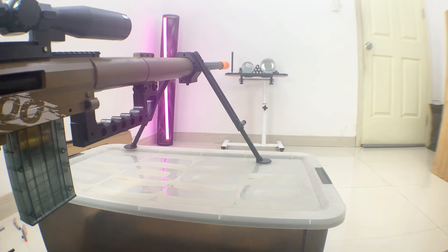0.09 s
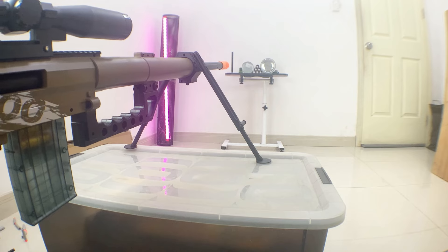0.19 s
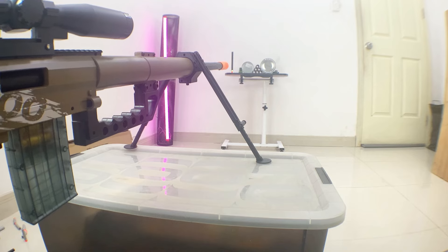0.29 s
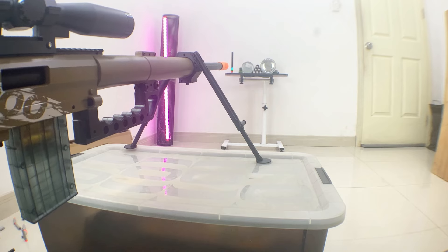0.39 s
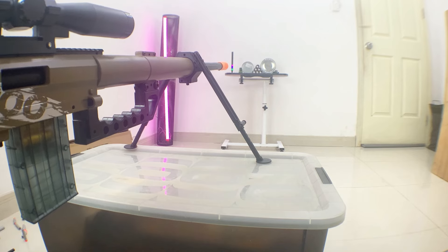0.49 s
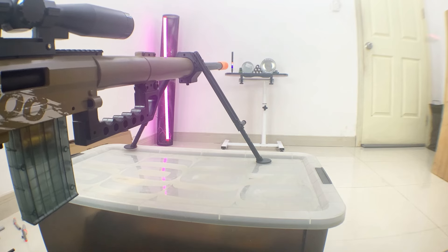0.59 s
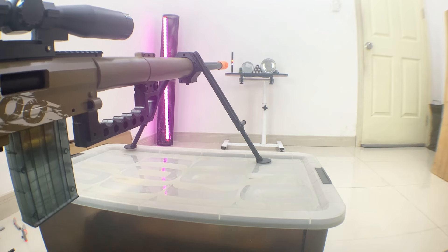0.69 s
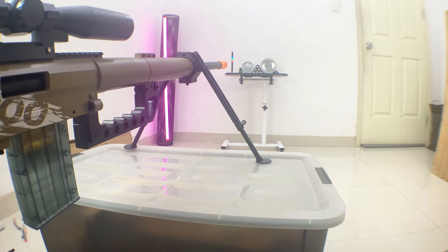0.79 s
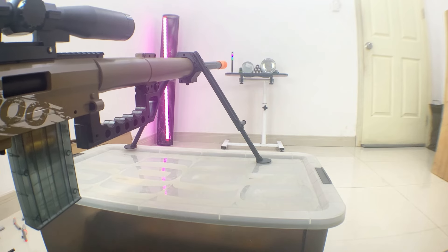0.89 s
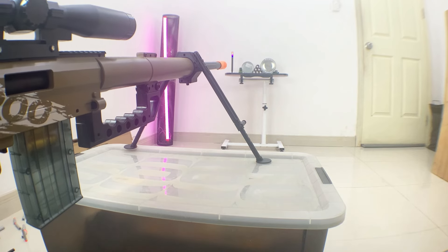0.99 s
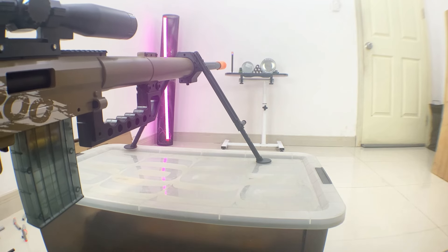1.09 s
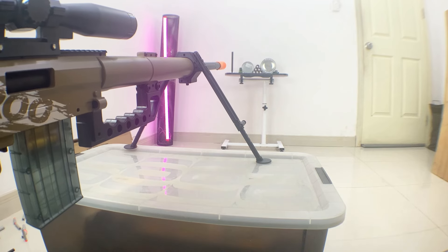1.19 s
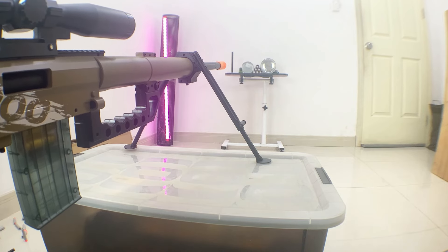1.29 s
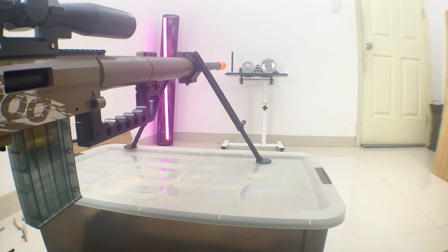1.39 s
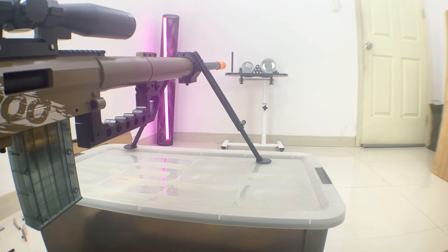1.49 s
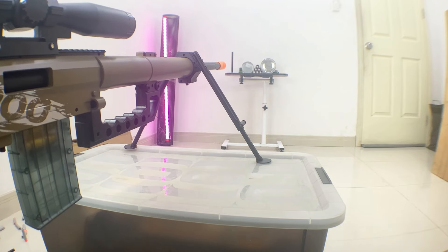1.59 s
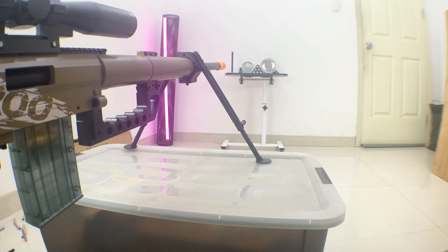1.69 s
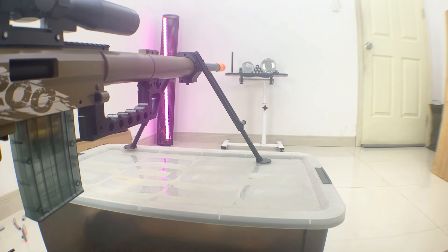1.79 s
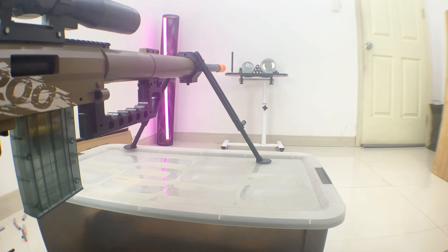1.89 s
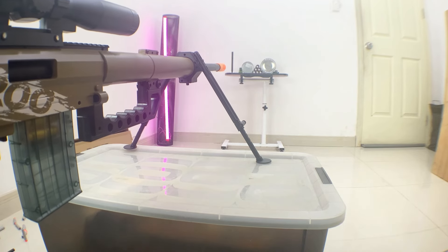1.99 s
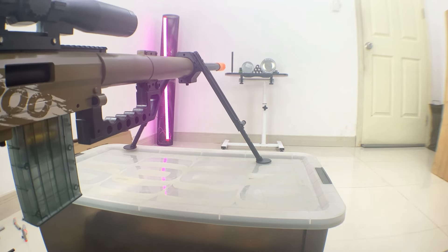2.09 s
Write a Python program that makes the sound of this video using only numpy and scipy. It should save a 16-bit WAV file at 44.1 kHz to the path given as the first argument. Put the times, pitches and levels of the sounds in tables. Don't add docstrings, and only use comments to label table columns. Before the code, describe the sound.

A toy dart rifle fires at 0.2 seconds with a tiny tick and hard plunger slam. At 0.31 the dart smacks a tin target, very loud and slightly squashed, rattling until 0.5 and ringing with wavering tones. At 0.93 the dart knocks sharply on the floor and bounces. From 1.2 to 2.1 faint plastic creaks, then a short double squeak near 2.0, over quiet room hum and tiled echo.

```python
import sys
import numpy as np
from scipy import signal
from scipy.fft import rfft, irfft, next_fast_len
from scipy.io import wavfile
from scipy.ndimage import uniform_filter1d, minimum_filter1d, map_coordinates

SR = 44100
rng = np.random.default_rng(int(sys.argv[2]) if len(sys.argv) > 2 else 0)


def boost(x):
    u = np.asarray(x, float) / 20
    return 10 ** u


def transcribe(u):
    v = np.clip(np.atleast_2d(u).T, -1, 1)
    q = np.round(v * 32767).astype(np.int16)
    wavfile.write(sys.argv[1], SR, q)


N = 94815
STRIKE_S = 0.3122


def unit(x):
    return x / np.sqrt(np.mean(x ** 2) + 1e-20)


def along(points, hz):
    f, v = np.transpose(points)
    return np.interp(np.log(hz + 1), np.log(f + 1), v)


def wobble(rate):
    knots = rng.standard_normal(int(N * rate / SR) + 4)
    return map_coordinates(knots, [np.arange(N) * rate / SR])


def filtered(x, response):
    m = next_fast_len(len(x) + 8192)
    h = response(np.fft.rfftfreq(m, 1 / SR))
    h = h / np.sqrt(np.mean(np.abs(h) ** 2))
    return irfft(rfft(x, m) * h, m)[:len(x)]


def resonance(f, centre, width, db):
    return boost(db) * 1j * f * width / (centre * centre - f * f + 1j * f * width)


def resonances(peaks):
    return lambda f: sum((-1) ** k * resonance(f, *peak) for k, peak in enumerate(peaks))


def causal(colour):
    def response(f):
        c = irfft(np.log(np.maximum(boost(along(colour, f)), 1e-5)))
        c[1:len(c) // 2] *= 2
        c[len(c) // 2 + 1:] = 0
        return np.exp(rfft(c))
    return response


def bursts(rows):
    t = np.arange(N) / SR
    x = np.zeros(N)
    for start, db, t60 in rows:
        fade = boost(db - 60 * np.abs(t - start) / t60)
        x += fade * (t >= start) * rng.standard_normal(N)
    return x


def clicks(rows):
    x = np.zeros(N)
    for start, db, t60 in rows:
        x[round(start * SR)] = boost(db) * np.sqrt(SR * t60 / np.log(1000) / 2)
    return x


def room(x, wet_db, feed=None):
    # frequency in Hz, time to fall by 60 dB in seconds.
    fading = [(100, 0.51), (350, 0.57), (1500, 0.64), (4000, 0.7), (8000, 0.57), (11500, 0.4),
              (13500, 0.24), (16000, 0.098)]
    hz, t, z = signal.stft(rng.standard_normal(SR), SR, nperseg=256)
    fade = boost(-60 * t / along(fading, hz)[:, None])
    tail = signal.istft(z / np.abs(z) * fade, SR, nperseg=256)[1]
    tail = np.pad(tail / np.linalg.norm(tail), (round(0.004 * SR), 0))
    source = x if feed is None else feed
    return x + boost(wet_db) * signal.fftconvolve(source, tail)[:N]


def knock(rows, colour, body, ring_db, wet_db):
    def response(f):
        lift = 1 + boost(ring_db) * sum(resonance(f, *peak) for peak in body)
        return causal(colour)(f) * lift
    return room(filtered(bursts(rows), response), wet_db, filtered(clicks(rows), response))


def room_air_and_hum():
    # frequency in Hz, level in dB per Hz.
    air_colour = [(12, -30), (20, -1), (100, -7.5), (226, -22), (365, -21), (1870, -33.5), (3380, -30.5),
                  (15000, -48), (16800, -65)]
    # frequency in Hz, width in Hz, level in dB.
    machine = [(320, 37, 2), (653, 27, 1.5), (1660, 250, -7.5), (2180, 130, -16), (3270, 110, -1.5),
               (4140, 200, -11.5), (6820, 48, -12.5), (9700, 94, -18), (10650, 140, -14.5)]
    air = unit(filtered(rng.standard_normal(N), lambda f: boost(along(air_colour, f))))
    hum = unit(filtered(rng.standard_normal(N), resonances(machine)))
    patchy_db = -3.5
    return boost(-51 + patchy_db * wobble(1.5)) * air + boost(-61.5 + patchy_db * wobble(10.0)) * hum


def creaks():
    # start in seconds, level in dB, centre in Hz, time to fall by 60 dB in seconds,
    # width as a share of the centre.
    joints = [(1.19, -47, 403, .05, .8), (1.2087, -44.5, 1810, 0.022, 2), (1.3355, -46, 1773, 0.017, 1.5),
              (1.4415, -55.5, 7000, 0.02, 1.8), (1.5174, -42, 2900, 0.013, 1.2),
              (1.5663, -56.5, 3310, 0.0062, 1.1), (1.596, -53, 4500, 0.011, 1.5),
              (1.649, -51.5, 1497, 0.029, 0.25), (1.7412, -50, 1960, 0.016, 1.8),
              (1.778, -52.5, 1200, 0.039, 1.5), (1.789, -53, 398.6, 0.061, 0.96),
              (1.849, -48, 1373, 0.032, 0.68), (1.8629, -48, 5020, 0.013, 0.81),
              (2.0677, -56, 4540, 0.0082, 2), (2.069, -47.5, 4650, .04, .4), (2.091, -49.5, 800, 0.049, .7),
              (2.105, -48.5, 684, 0.053, .7), (2.116, -41, 1110, 0.029, 1.6),
              (2.13, -50.5, 910, 0.045, 1.3), (2.139, -54, 890, 0.05, 0.89)]
    x = np.zeros(N)
    for start, db, hz, t60, width in joints:
        joint = resonances([(hz, width * hz, 0)])
        x += filtered(bursts([(start, db, t60)]), lambda f: joint(f) ** 3)
    return room(x, -11.5)


def stick_slip(rows, overtones):
    # frequency in Hz, level in dB per Hz.
    haze_colour = [(2000, -19.5), (2900, -10.5), (3700, -2.5), (4200, -18), (6000, -13), (7500, -23.5),
                   (12000, -38), (16000, -50.5)]
    t = np.arange(N) / SR
    start, hz, db = np.transpose(rows)
    level_db = np.interp(t, start, db, -120, -120)
    pitch = np.interp(t, start, hz) * (1 + 0.012 * wobble(400))
    turn = 2 * np.pi * np.cumsum(pitch) / SR
    sharp = boost(0.7 * (level_db + 36))
    tone = np.sin(turn) + sharp * sum(boost(g) * np.sin(k * turn) for k, g in overtones)
    rough_level = boost(level_db + 3 * wobble(420))
    haze = boost(-12) * filtered(rng.standard_normal(N), lambda f: boost(along(haze_colour, f)))
    haze_level = uniform_filter1d(boost(level_db), size=round(0.011 * SR))
    return tone * rough_level + haze * haze_level


def squeak():
    # time in seconds, pitch in Hz, level in dB.
    lower = [
        (1.945, 3100, -59),
        (1.962, 3115, -44.5),
        (1.97, 2980, -43.5),
        (1.979, 3014, -33.5),
        (1.984, 3233, -40.5),
        (1.991, 3105, -69.5),
        (2.003, 3057, -44.5),
        (2.022, 3100, -45.5),
        (2.053, 2863, -46),
        (2.061, 2930, -63.5),
    ]
    higher = [
        (1.979, 3600, -71),
        (1.986, 3650, -43),
        (2.002, 3600, -50),
        (2.019, 3550, -45),
        (2.028, 3450, -36.5),
        (2.046, 3490, -44.5),
        (2.061, 3480, -47),
        (2.071, 3480, -80.5),
    ]
    # multiple of the pitch, level in dB at full force.
    overtones = [
        [(2, -18), (3, -18), (4, -30)],
        [(2, -12), (3, -25), (4, -40)],
    ]
    return room(stick_slip(lower, overtones[0]) + stick_slip(higher, overtones[1]), -10)


def dart_landing():
    # start in seconds, level in dB, time to fall by 60 dB in seconds.
    hits = [
        (.9256, -15.5, 0.0057),
        (.927, -32, 0.015),
        (.932, -35, 0.0079),
        (.945, -29.5, 0.0092),
        (.955, -33.5, 0.024),
    ]
    # frequency in Hz, level in dB per Hz.
    colour = [(400, -24), (1200, -13.5), (1700, -7), (3100, -3.5), (3600, -16.5), (6800, -22),
              (9800, -19.5), (14000, -35)]
    # frequency in Hz, width in Hz, level in dB.
    body = [(1700, 100, 10.5), (2800, 900, -3), (4290, 250, 3), (4690, 264, 12)]
    return knock(hits, colour, body, ring_db=1.5, wet_db=-1)


def tin_blows():
    # start in seconds, level in dB, time to fall by 60 dB in seconds.
    strike = [
        (.3122, 6.5, 0.027),
        (.316, -1.5, .06),
    ]
    rattles = [
        (.36, -5, 0.02),
        (.385, 4.5, 0.022),
        (.409, -2.5, 0.018),
        (.428, -19, 0.0097),
        (.457, -1, 0.01),
        (.505, -11, 0.011),
    ]
    # frequency in Hz, level in dB per Hz.
    strike_colour = [(60, -58.5), (240, -31), (330, -15.5), (800, -12.5), (2500, -12.5), (4500, -12),
                     (9000, -14.5), (16000, -24)]
    rattle_colour = [(200, -46), (400, -10), (1700, -7), (2400, -5.5), (4500, -7.5), (7000, -28),
                     (16000, -60.5)]
    # frequency in Hz, width in Hz, level in dB.
    body = [(330, 73, 21.5), (420, 10, 7), (590, 35, 9), (770, 96, 4.5), (1344, 120, 5.5), (1690, 50, 9),
            (4070, 410, 1.5), (4505, 180, 1.5)]
    blow = knock(strike, strike_colour, body, ring_db=-1, wet_db=3.5)
    return blow + knock(rattles, rattle_colour, body, ring_db=-1, wet_db=-3.5)


def tin_ring():
    pitches = [328, 389, 422, 587, 770, 985, 1325, 1549, 1678, 1722, 2199, 2742, 4570, 4139]
    # level in dB, time to fall by 60 dB in seconds, beats in Hz,
    # rise in seconds.
    tones = [(-2, 0.53, 3.1, 0.006), (-7.5, 0.66, 5.2, 0.0034), (2.5, 0.53, 5.5, 0.015),
             (-14.5, 0.48, 5.2, 0.0068), (-9, 0.38, 9.2, .004), (-14, 0.75, 36, 0.005),
             (-14, 0.69, 14, 0.001), (-4.5, 0.3, 3.4, 0.0012), (2.5, 0.64, 5.4, 0.12), (3.5, 0.31, 14, 0.1),
             (-17.5, 1, 7, 0.011), (-8.5, 0.47, 16, .02), (-24.5, 1, 3.7, .02), (-23.5, 0.66, 17, .02)]
    t = np.maximum(np.arange(N) / SR - STRIKE_S, 0)
    ring = np.zeros(N)
    for hz, (db, t60, beat, rise) in zip(pitches, tones):
        level = boost(db - 60 * t / t60 + 2.5 * wobble(45)) * (1 - np.exp(-t / rise))
        beating = 1 + 0.22 * np.cos(2 * np.pi * beat * t)
        ring += level * beating * np.sin(2 * np.pi * hz * t + 0.3 * wobble(39.62))
    return room(boost(-6) * ring, -4)


def plate():
    now = np.arange(N) / SR
    t = np.maximum(now - STRIKE_S, 0)
    drop_db = -3.5 * (now > 0.91)
    rise = (1 - np.exp(-t / 0.22)) ** 2
    return boost(-22.5 - 60 * t / 1.34 + drop_db) * rise * np.sin(2 * np.pi * 858 * t)


def shivers():
    # middle in seconds, level in dB, pitch in Hz, half length in seconds.
    moments = [(0.319, 3.5, 1300, 0.004), (0.326, -13.5, 770, 0.042), (0.358, -3.5, 1690, 0.015),
               (0.363, -12, 590, 0.013), (0.394, -19, 1321, 0.0049), (0.387, -8, 1690, 0.013),
               (0.392, -7.5, 421.5, 0.027), (0.408, -8, 1683, 0.011), (0.413, -11.5, 1843, 0.016),
               (0.431, -3.5, 1700, 0.0081), (0.434, -14.5, 330, 0.06), (0.456, -9, 1698, 0.0088),
               (0.458, -20.5, 708, 0.027), (0.47, -17, 2130, 0.018), (0.508, -15.5, 1366, 0.03),
               (0.513, -37, 420, 0.022), (0.55, -20, 1680, 0.026), (0.567, -36, 400, 0.074),
               (0.62, -20.5, 1700, 0.0061), (0.632, -26.5, 420, 0.021), (0.633, -28.5, 1309, 0.02),
               (.722, -23.5, 1348, 0.007)]
    now = np.arange(N) / SR
    t = np.maximum(now - STRIKE_S, 0)
    x = np.zeros(N)
    for middle, db, hz, half in moments:
        swell = np.exp(-2 * ((now - middle) / half) ** 2)
        x += boost(db) * swell * np.sin(2 * np.pi * hz * t)
    return x


def rifle_shot():
    # start in seconds, level in dB, time to fall by 60 dB in seconds.
    contacts = [
        (.1945, -46, 0.012),
        (.2055, -37, 0.0033),
        (.2078, -13.5, 0.081),
        (.2148, -8, 0.087),
        (.2172, -13, 0.02),
        (.2195, -10.5, 0.027),
        (.228, -13, .03),
    ]
    # frequency in Hz, level in dB per Hz.
    colour = [(40, -28), (100, -17), (450, -17), (1900, -22.5), (3200, -20), (4900, -19.5), (5600, -22.5),
              (14000, -37)]
    # frequency in Hz, width in Hz, level in dB.
    body = [(580, 41, 11), (1000, 60, 6), (2742, 450, 3.5), (3380, 200, 0.5), (3960, 370, 0.5),
            (4640, 67, 1.5)]
    return knock(contacts, colour, body, ring_db=-4, wet_db=-0.5)


def scene():
    rifle = rifle_shot() + creaks() + squeak()
    target = tin_blows() + tin_ring() + plate() + shivers()
    return (rifle + target + dart_landing() + room_air_and_hum())[None]


def band_limit(x):
    return signal.sosfilt(signal.butter(12, 16990, fs=SR, output="sos"), x)


def record(dry):
    # time in seconds, gain in dB.
    riding = [(0, -0.5), (0.202, -0.5), (.3, -3), (0.457, -1.5), (0.473, -4.5), (0.518, -4), (.53, -7),
              (.64, -5.5), (0.651, -9.5), (.76, -1.5), (0.872, 6), (0.922, 2.5), (0.98, 2), (0.99, -2.5),
              (1.09, -2), (1.11, -2), (1.4, 0.5), (2.15, -1.56)]
    x = dry * boost(np.interp(np.arange(N) / SR, *np.transpose(riding)))
    need = np.minimum(1, boost(4.5) / (np.abs(x) + 1e-9))
    held = minimum_filter1d(need, size=round(0.006 * SR))
    x = x * uniform_filter1d(held, size=round(0.026 * SR))
    top, knee = 0.85, 6.6
    x = x / (1 + np.abs(x / top) ** knee) ** (1 / knee)
    x = signal.sosfilt(signal.cheby2(22, 60, 15950, fs=SR, output='sos'), x)
    return band_limit(x)


dry = scene()
out = record(dry)
transcribe(out)
```